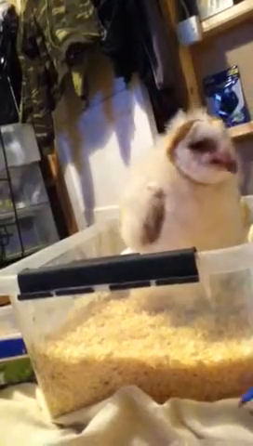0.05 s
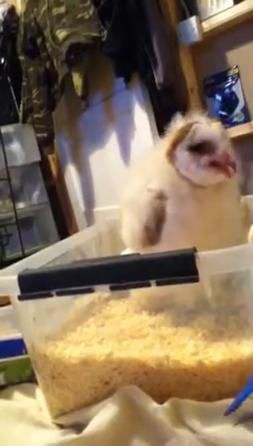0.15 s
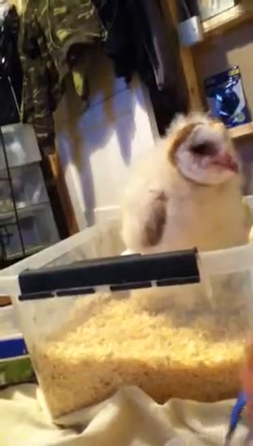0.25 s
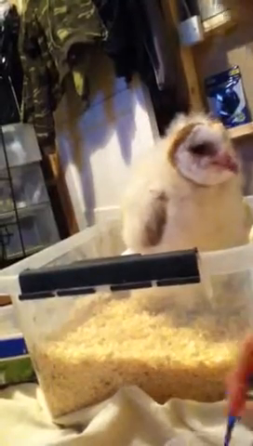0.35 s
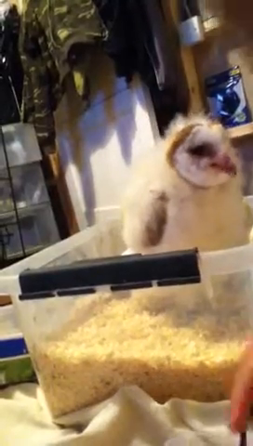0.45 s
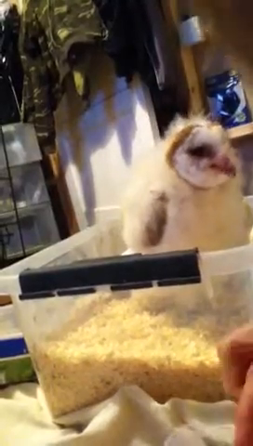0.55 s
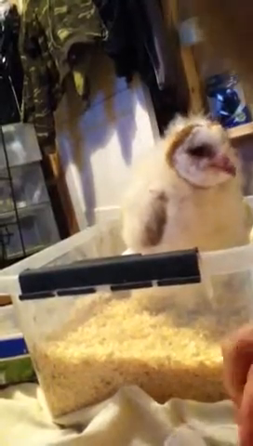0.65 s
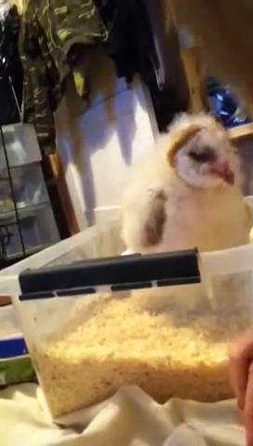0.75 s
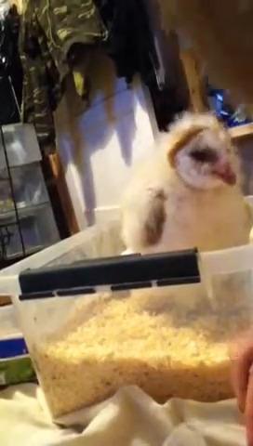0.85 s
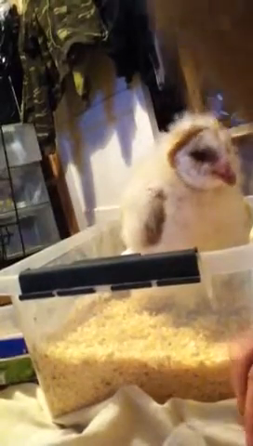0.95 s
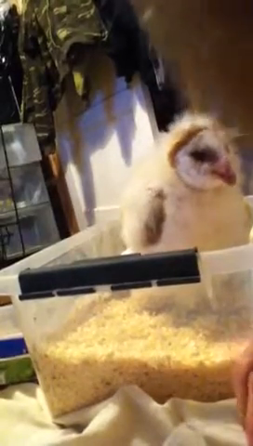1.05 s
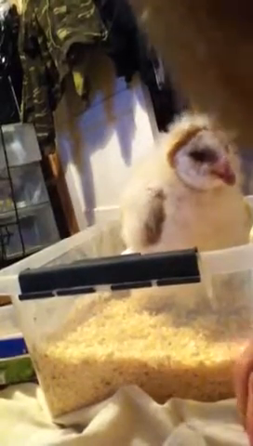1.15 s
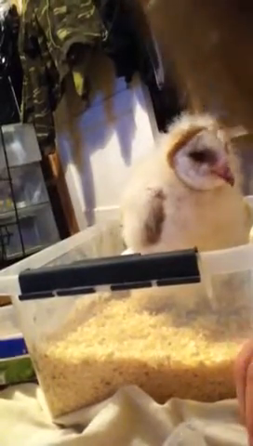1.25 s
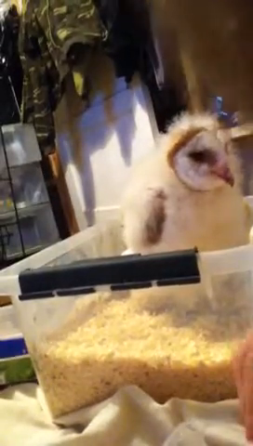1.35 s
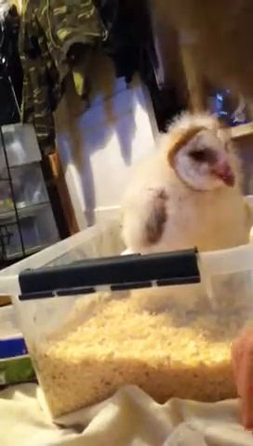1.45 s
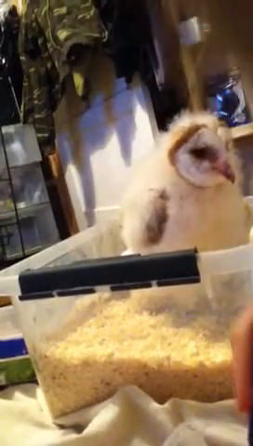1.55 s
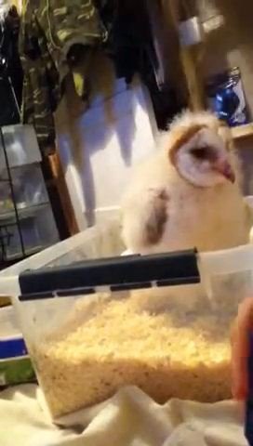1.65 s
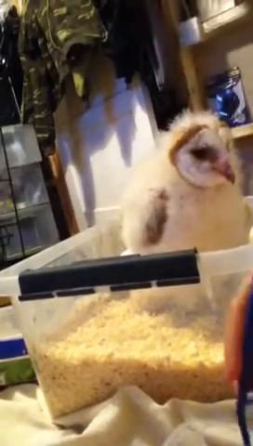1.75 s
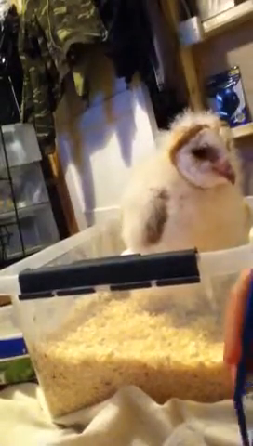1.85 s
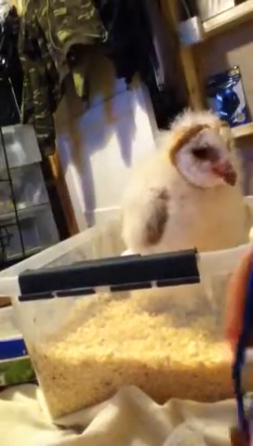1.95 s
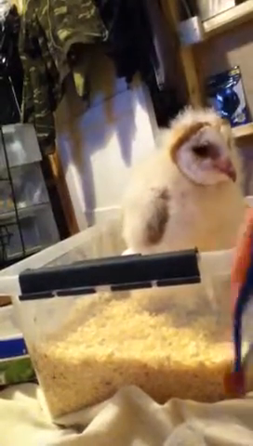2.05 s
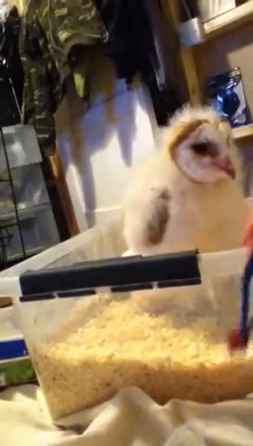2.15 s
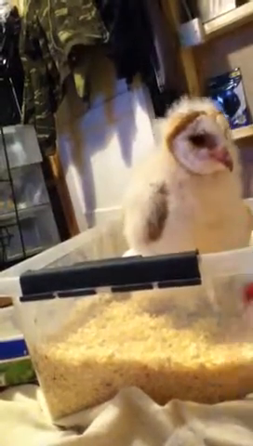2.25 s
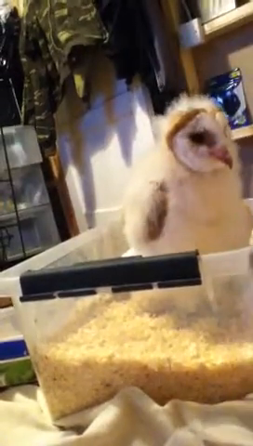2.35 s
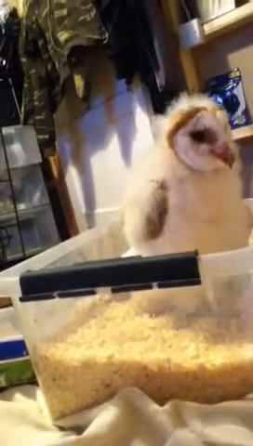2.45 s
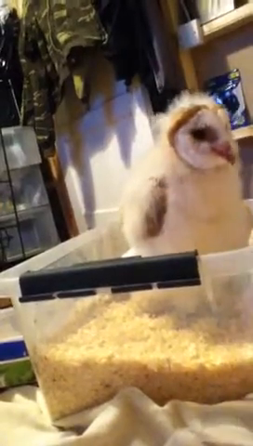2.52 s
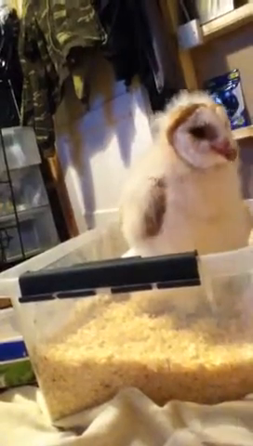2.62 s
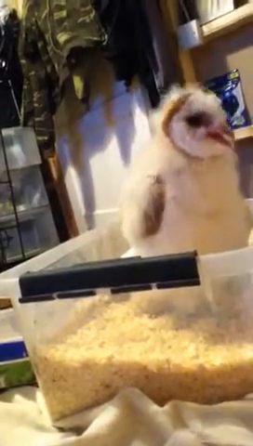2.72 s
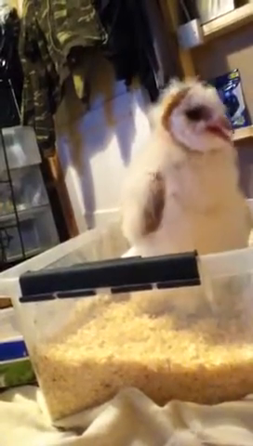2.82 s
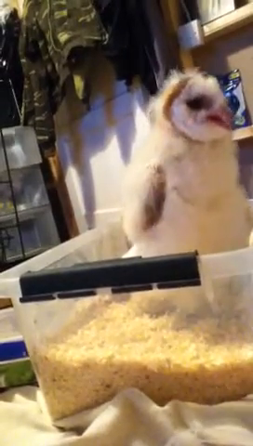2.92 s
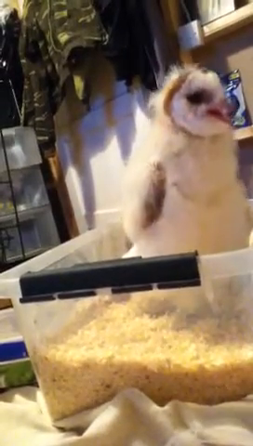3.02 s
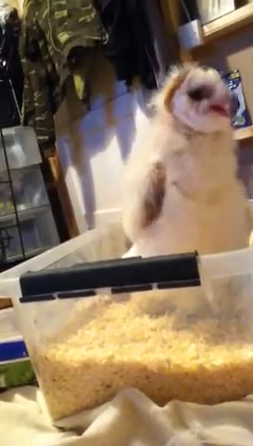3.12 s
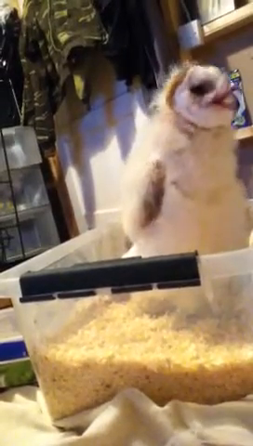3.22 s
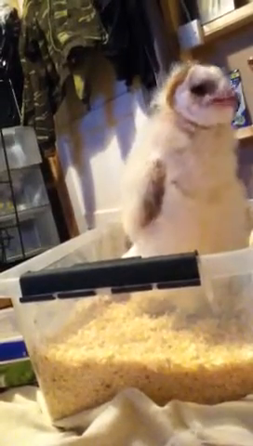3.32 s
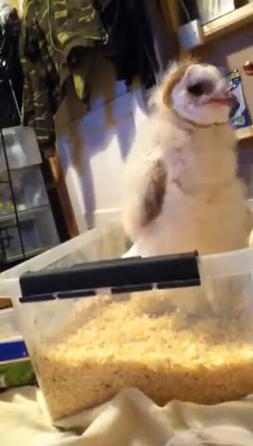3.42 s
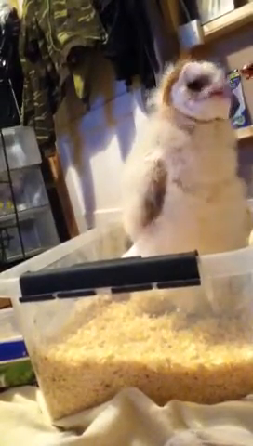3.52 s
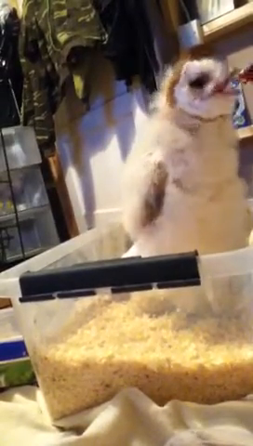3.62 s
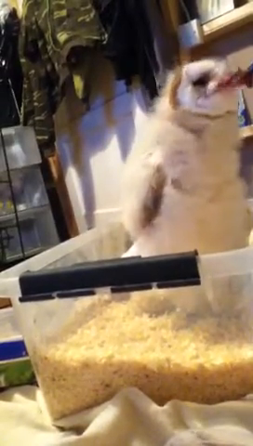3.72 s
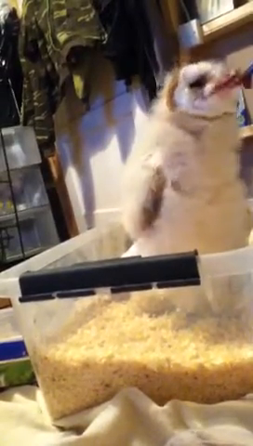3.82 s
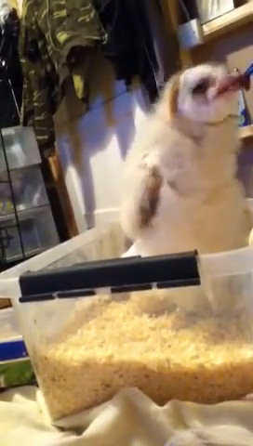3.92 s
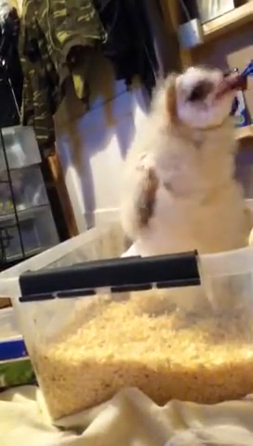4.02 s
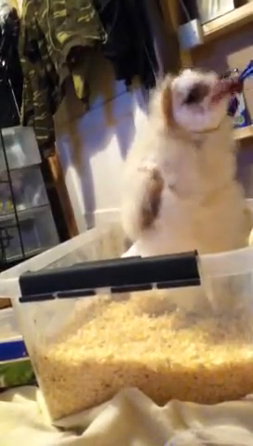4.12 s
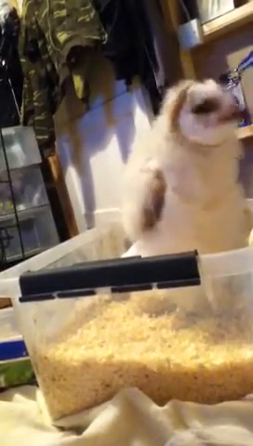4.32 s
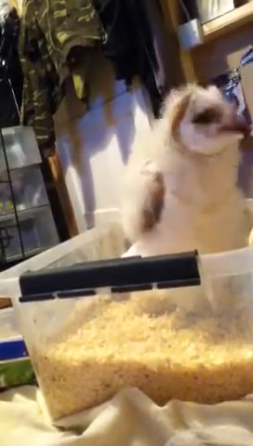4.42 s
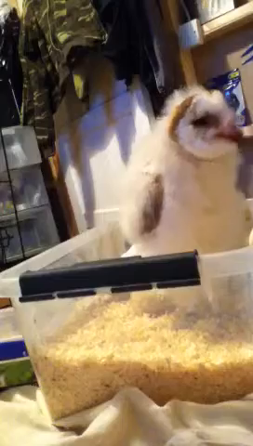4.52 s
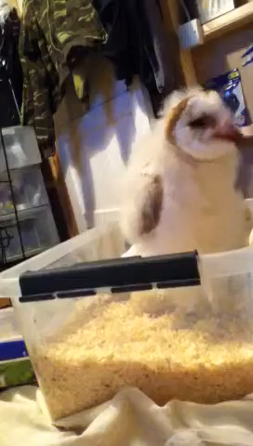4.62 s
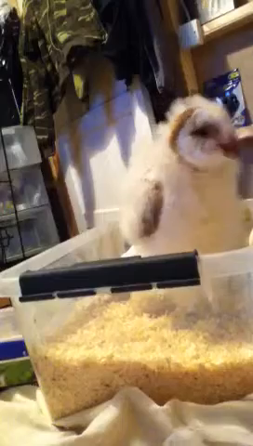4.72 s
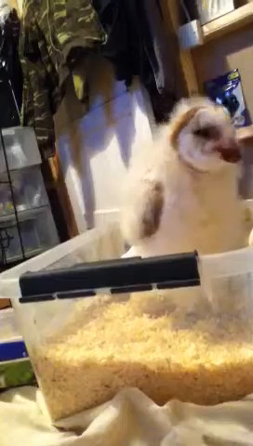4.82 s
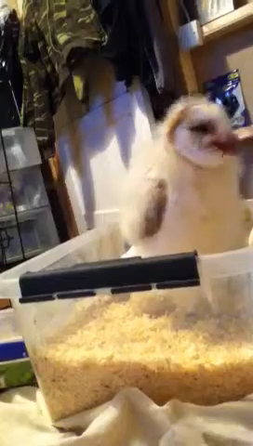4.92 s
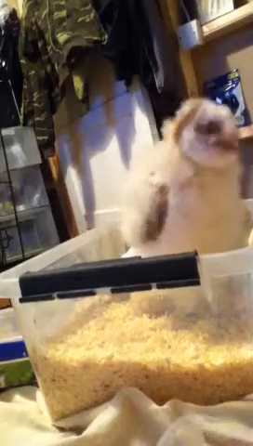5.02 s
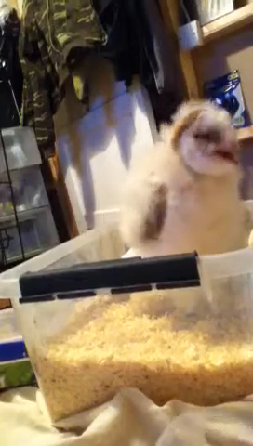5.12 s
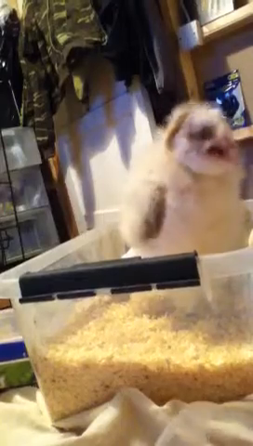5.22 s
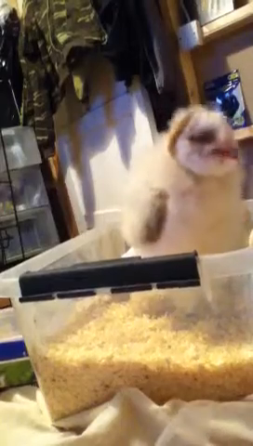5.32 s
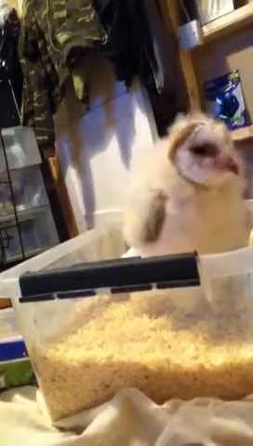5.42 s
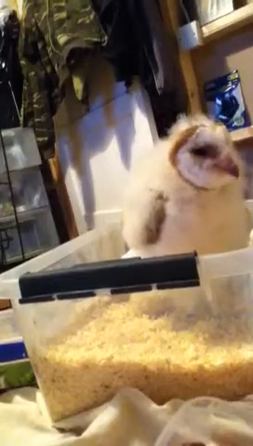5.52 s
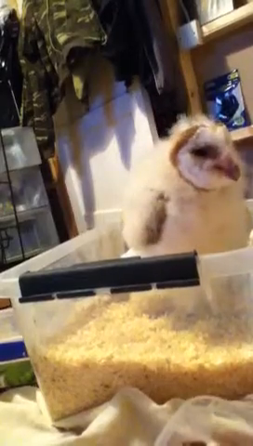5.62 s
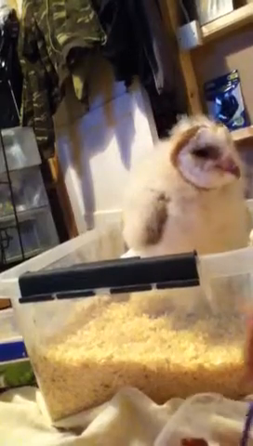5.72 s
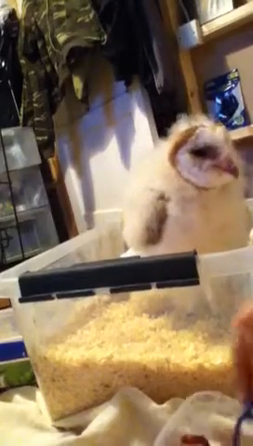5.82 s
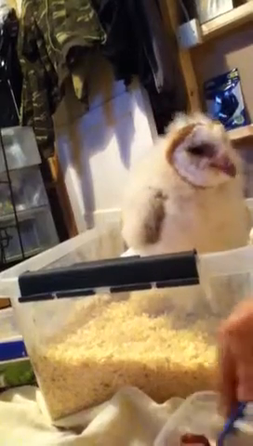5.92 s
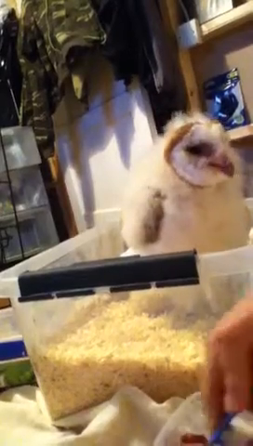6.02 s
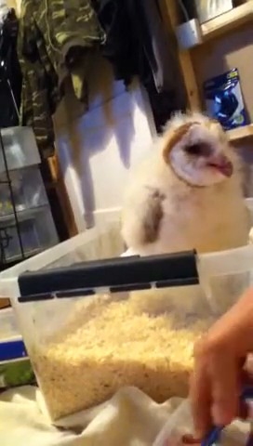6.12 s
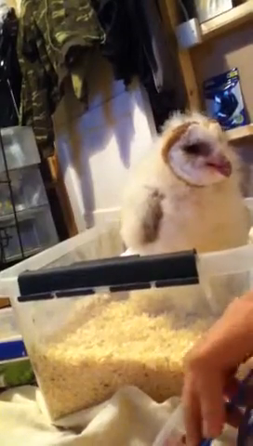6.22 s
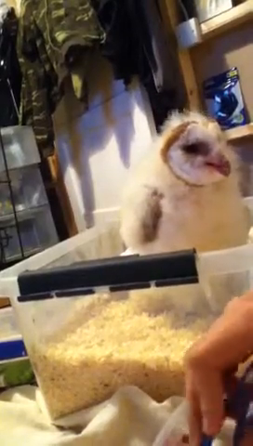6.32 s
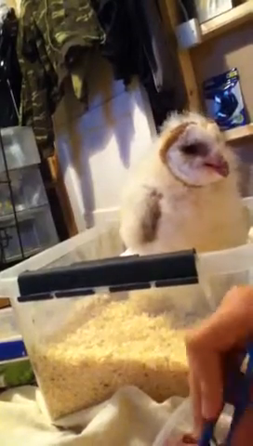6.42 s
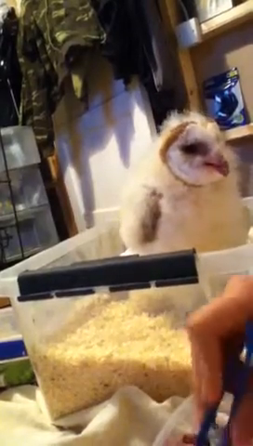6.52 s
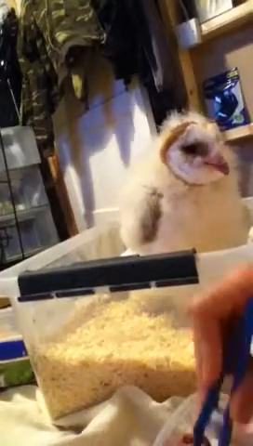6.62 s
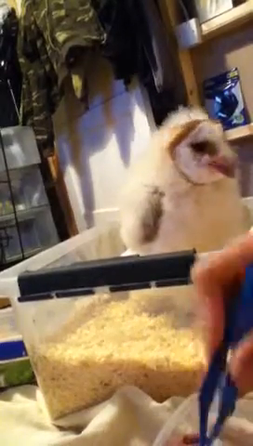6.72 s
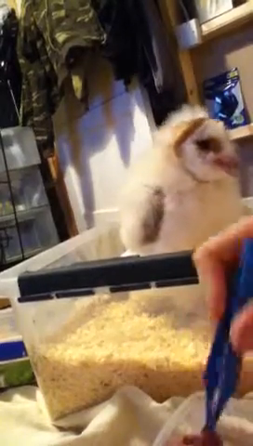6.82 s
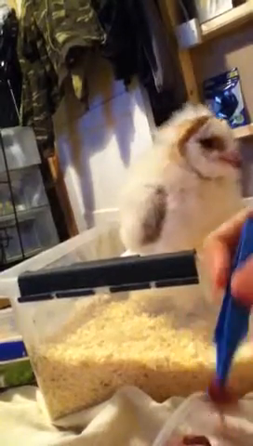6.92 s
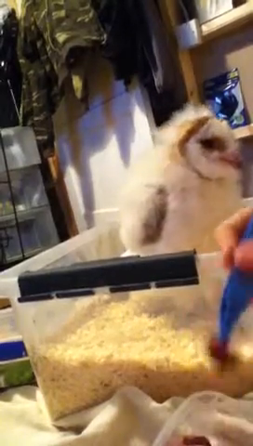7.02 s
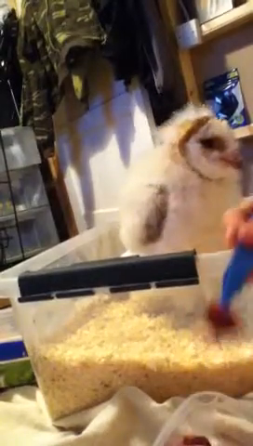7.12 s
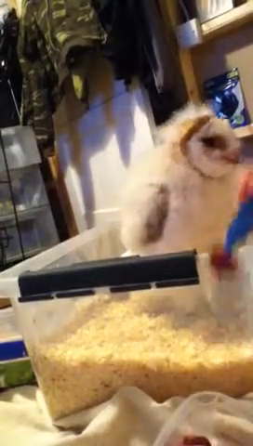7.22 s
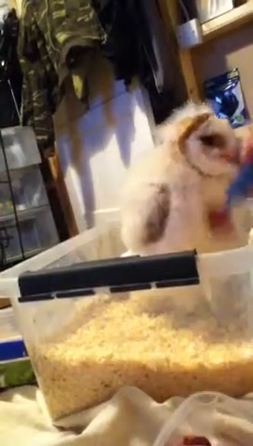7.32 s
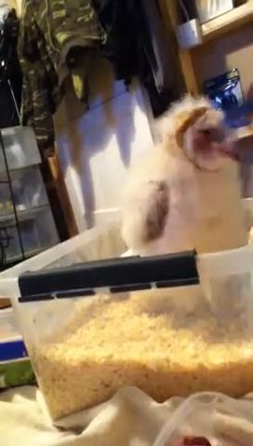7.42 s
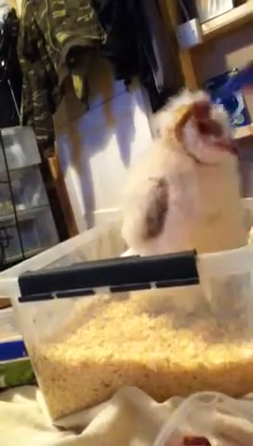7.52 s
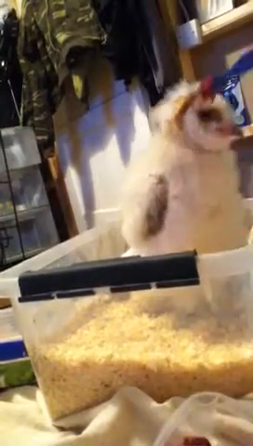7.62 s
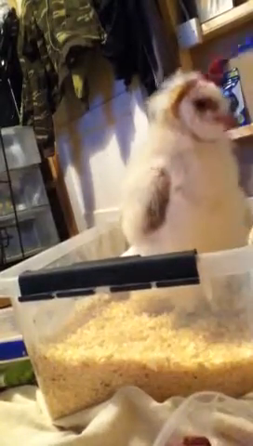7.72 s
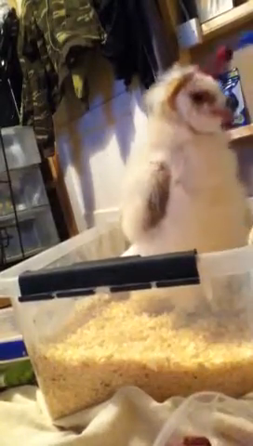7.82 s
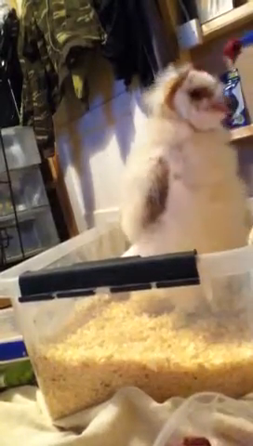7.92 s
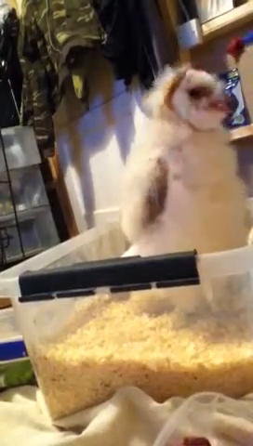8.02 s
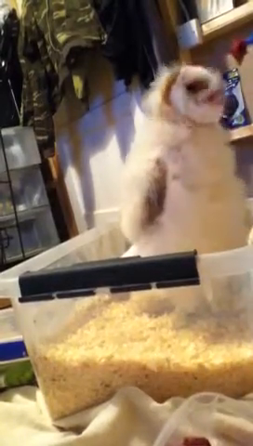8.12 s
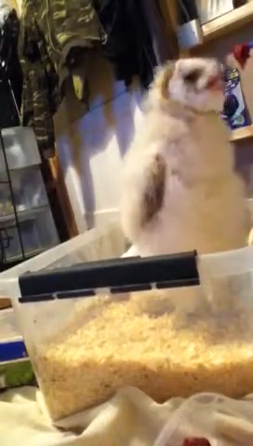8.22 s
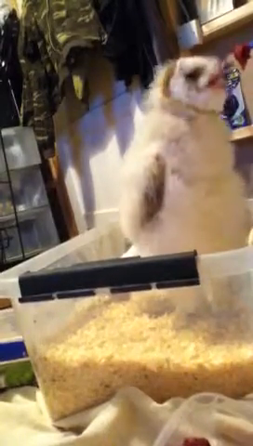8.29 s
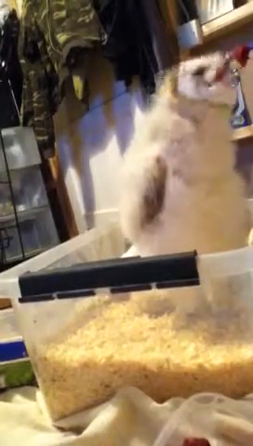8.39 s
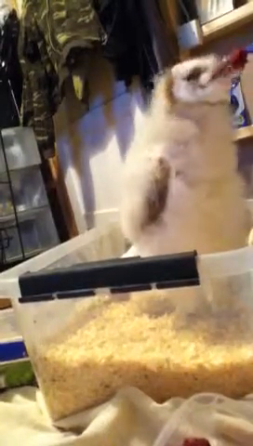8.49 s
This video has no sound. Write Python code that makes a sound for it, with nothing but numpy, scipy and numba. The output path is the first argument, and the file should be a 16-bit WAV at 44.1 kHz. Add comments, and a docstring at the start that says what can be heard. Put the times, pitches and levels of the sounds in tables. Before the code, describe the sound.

Close up in a small, muffled room, a young owl lets out a harsh, breathy screech. A soft knock on a plastic tub follows, then a second, louder screech. After a longer pause with faint clicks of beak and tweezers, the owl screeches twice more. Each call grows in strength and cuts off quickly, with hardly any echo over a faint, steady background hum.

```python
"""In a small, cluttered room, an owl chick close by begs for food with four rasping screeches.
Air forced through the syrinx breaks into sharp, irregular pulses (the source) that excite the
resonances of the throat and open beak (the filter). Between the calls there are only faint ticks of
beak and feeding tweezers, rustles, one soft knock, a brief wavering tone and the room's hum."""
import sys
import numpy as np
from scipy import signal
from scipy.fft import rfft, irfft
from scipy.io import wavfile
from scipy.ndimage import uniform_filter1d
from numba import njit

SR = 44100
rng = np.random.default_rng(int(sys.argv[2]) if len(sys.argv) > 2 else 0)


def to_wav(sig):
    """Store sig (one row per channel, or 1-D mono) as 16-bit WAV at the path in sys.argv[1].

    Samples outside -1..1 are clipped; the rate is SR.
    """
    pcm = np.clip(np.atleast_2d(sig), -1, 1) * 32767
    pcm = np.round(pcm).astype(np.int16)
    wavfile.write(sys.argv[1], SR, pcm.T)  # frames by channels


N = 377055
TIME = np.arange(N) / SR


def undb(db):
    """Amplitude ratio of a level in decibels."""
    return 10 ** (np.asarray(db) / 20)


def unit(x):
    """Normalisation to an rms of 1."""
    return x / np.sqrt(np.mean(x ** 2))


def steady(x, size=1764):
    """Division by the running rms: the envelope flattens, the fast grain remains."""
    return x / np.sqrt(uniform_filter1d(x ** 2, size) + 1e-18)


def ease(x):
    """Cubic step from 0 to 1."""
    x = np.clip(x, 0, 1)
    return x * x * (3 - 2 * x)


def blend(relaxed, strained, strain):
    """Linear interpolation between the relaxed and the strained state."""
    return relaxed + strain * (strained - relaxed)


def swell(x, db):
    """Tapered envelope: a short sound fades in to level db and out again."""
    return undb(db) * unit(x) * signal.windows.tukey(len(x), .6)


def add(out, start_s, x):
    """Superposition of x on out from start_s on."""
    i = max(int(start_s * SR), 0)
    out[i:i + len(x)] += x[:len(out) - i]


@njit
def state_variable(x, tuning, damping):
    """Damped oscillator made of two integrators in a loop; its output is band-passed."""
    y, band_state, low_state = np.empty(len(x)), 0., 0.
    for i in range(len(x)):
        g = tuning[i]
        velocity = (band_state + g * (x[i] - low_state)) / (1 + g * (g + damping[i]))
        band_state = 2 * velocity - band_state
        low_state += 2 * g * velocity
        y[i] = damping[i] * velocity
    return y


def band(x, hz, width):
    """Resonance with gain 1 at a centre frequency that may move."""
    hz = np.minimum(hz, .45 * SR) * np.ones(len(x))
    return state_variable(x + 1e-18, np.tan(np.pi * hz / SR), width / hz)


def bell(x, hz, width, db):
    """Interference of a sound with its resonant band gives a peak or a dip."""
    return x + (undb(db) - 1) * band(x, hz, width)


def colour(x, points, size=8192):
    """Minimum-phase filter through points of (frequency [Hz], gain [dB])."""
    hz, db = np.transpose(points)
    bin_hz = np.maximum(np.arange(size // 2 + 1) * SR / size, 1)
    gain = undb(np.interp(np.log(bin_hz), np.log(hz), db))
    cepstrum = irfft(np.log(gain))
    cepstrum[1:size // 2] *= 2  # folding the cepstrum makes the response causal
    cepstrum[size // 2 + 1:] = 0
    return signal.fftconvolve(x, irfft(np.exp(rfft(cepstrum))))[:len(x)]


def below(x, hz, order=4):
    """Zero-phase low-pass, which keeps pulses in place."""
    return signal.sosfiltfilt(signal.butter(order, hz, fs=SR, output="sos"), x)


def glides(rows, waver, waver_hz):
    """Frequency modulation by noise: gliding tones whose pitch trembles."""
    out = np.zeros(N)
    for start_s, length, start_hz, end_hz, db in rows:
        n = int(length * SR)
        tremble = unit(band(rng.standard_normal(n), waver_hz, 2 * waver_hz))
        hz = np.linspace(start_hz, end_hz, n) * (1 + waver * tremble)
        add(out, start_s, swell(np.sin(2 * np.pi * np.cumsum(hz) / SR), db))
    return out


def room_air():
    """Broadband noise gives rumble and hiss; narrowband noise gives a weak hum."""
    # spectrum of the noise floor: (frequency [Hz], relative spectral density [dB])
    floor_spectrum = [(15, -50), (25, -17), (86, -2), (120, -3.5), (141, -0.5), (189, -2), (269, -3.5),
                      (333, -5.5), (425, -8.5), (513, -11.5), (710, -12.5), (769, -13.5), (1090, -17),
                      (8270, -21.5), (15800, -24)]
    hum = unit(band(rng.standard_normal(N), hz=193, width=8))
    floor = unit(colour(rng.standard_normal(N), floor_spectrum))
    return undb(-56.5) * floor + undb(-74.5) * hum


def faint_tone():
    """A brief background tone falls and wavers by frequency modulation."""
    # the glide: (time [s], duration [s], start pitch [Hz], end pitch [Hz], level [dB])
    tone = [(1.61, .19, 748, 670, -60.5)]
    return glides(tone, waver=.06, waver_hz=50)


def handling(size=4096):
    """Impacts decay exponentially, as noise in ticks and as modes in a knock; rustles are noise bands."""
    # beak and tweezer ticks: (time [s], centre [Hz], bandwidth [Hz], time constant [s], level [dB])
    ticks = [(0.171, 5470, 6000, .003, -45), (1.901, 6500, 3000, 0.0011, -46.5),
             (2.057, 2780, 700, .002, -45.5), (3.804, 8200, 4000, 0.0022, -49),
             (4.002, 2700, 3000, .004, -53), (4.7158, 10100, 3500, 0.0009, -42.5),
             (4.955, 12000, 7000, .001, -48), (5.424, 2200, 1500, 0.0091, -55.5),
             (5.770, 12500, 5000, .001, -49), (6.944, 2100, 1200, .006, -54.5),
             (7.379, 1100, 1000, .004, -52.5)]
    # rustles and soft bumps: (time [s], duration [s], centre [Hz], bandwidth [Hz], level [dB])
    rustles = [(0, .17, 2730, 900, -64.5), (.18, 0.06, 4960, 4000, -59), (2.057, 0.076, 2190, 900, -64),
               (3.7, 0.084, 600, 250, -63), (7.471, .13, 220, 130, -60), (7.93, 0.028, 277, 200, -55)]
    out, t = np.zeros(N), TIME[:size]
    for start_s, hz, width, decay, db in ticks:
        noise = unit(band(rng.standard_normal(size), hz, width))
        add(out, start_s, undb(db) * noise * np.exp(-t / decay))
    for start_s, length, hz, width, db in rustles:
        noise = band(rng.standard_normal(int(length * SR)), hz, width)
        add(out, start_s, swell(band(noise, hz, width), db))
    # modes of a knocked plastic tub: (frequency [Hz], 60 dB decay time [s], level [dB])
    knock_s, tub_modes = 2.0572, [(346, .032, -41), (700, .0098, -38)]
    for hz, t60, db in tub_modes:
        add(out, knock_s, undb(db - 60 * t / t60) * np.sin(2 * np.pi * hz * t))
    return out


def syrinx(rate, jitter, scatter_db, turbulence, count=6000):
    """Aperiodic source: pulses, each with its own gap and size, in a stream of turbulent air."""
    # spectrum of one pulse: (frequency [Hz], gain [dB])
    pulse_spectrum = [(200, -19), (500, -17), (1100, -13), (1700, -4), (3000, -2), (6000, -2.5),
                      (10000, 0.0), (13000, -5), (15500, -13)]
    timing, size = rng.standard_normal((count, 2)).T
    gap = np.exp(jitter * timing - jitter ** 2 / 2)  # log-normal, with a mean of one period
    onsets = np.searchsorted(np.cumsum(rate) / SR, np.cumsum(gap))
    heard = onsets < len(rate)
    strength = np.sqrt(gap) * undb(scatter_db * size)  # pressure builds up during a long gap
    pulses = np.bincount(onsets[heard], strength[heard], len(rate))
    pulses -= below(pulses, 260, order=2)  # steady flow makes no sound
    return colour(steady(pulses) + turbulence * rng.standard_normal(len(rate)), pulse_spectrum)


def screech(call, throat):
    """Source and filter: a rasp swells, tires and stops; its formants move with strain and the beak."""
    length, flow_db, wait, rise, exponent, release, push_db, tensing, strained_rate = call[:9]
    notch_width = call[9]
    treble, notch, notch_depth = np.reshape(call[10:], (3, 2))
    onset_s, attack_s, opening_s, closing_s = .0062, .025, .018, .075
    tiring_db_per_s, treble_tiring_db_per_s = 9, 8.5
    shut_treble_db, shut_sink = -9, .18  # a shut beak dulls the treble and lowers the formants
    relaxed_rate = 1200  # pulses per second

    # A weak airflow opens and closes the call; the push swells on top of it, then tires.
    t = TIME[:int((length + closing_s) * SR)]
    ending = 1 - np.clip((t - length) / closing_s, 0, 1)
    flow = ease(t / onset_s) * ending
    push = ease((t - wait) / attack_s) * np.clip((t - wait) / rise, 0, 1) ** exponent
    push /= 1 + np.exp((t - length) / release)
    tired_s = np.maximum(t - wait - rise, 0)
    envelope = np.hypot(flow * undb(flow_db), push * undb(push_db - tiring_db_per_s * tired_s))
    strain = ease(t / tensing) * ending
    shut = 1 - ease(t / opening_s) * ending

    voice = syrinx(blend(relaxed_rate, strained_rate, strain), jitter=.48, scatter_db=2.5, turbulence=.44)
    for relaxed_hz, strained_hz, width, relaxed_db, strained_db in throat:
        formant_hz = (1 - shut_sink * shut) * blend(relaxed_hz, strained_hz, strain)
        voice = bell(voice, formant_hz, width, blend(relaxed_db, strained_db, strain))
    for _ in range(2):  # the antiresonance of the beak cavity, in two stages for steep sides
        voice = bell(voice, blend(*notch, strain), notch_width, blend(*notch_depth, strain) / 2)
    body = below(voice, hz=6800)
    treble_db = blend(*treble, strain) + shut_treble_db * shut - treble_tiring_db_per_s * tired_s
    rasp = envelope * (steady(body) + undb(treble_db) * steady(voice - body))

    # The hollow rush of air in the throat grows far more slowly than the rasp.
    rush = unit(band(band(rng.standard_normal(len(t)), 650, 550), 640, 1300))
    return rasp + undb(-48.5) * envelope ** .1 * flow * rush


def owl():
    """Airflow drives four screeches, each with its own formants, and brief squeaks and wheezes."""
    # squeaks as the airway opens or closes, and hollow wheezes that end a call:
    # (time [s], duration [s], start pitch [Hz], end pitch [Hz], level [dB])
    squeaks = [(.703, .007, 2600, 2500, -42.5), (5.9595, 0.0082, 3230, 3100, -44),
               (6.747, .025, 3580, 2580, -52), (8.0178, 0.0039, 3130, 2900, -40)]
    wheezes = [(1.395, 0.078, 1800, 1364, -53.5), (3.40, 0.047, 1410, 1060, -47.5)]
    # the calls: (time [s], duration [s], flow level [dB], delay of the push [s], rise time [s],
    # rise exponent, release time [s], push level [dB], time to full strain [s], strained pulse
    # rate [1/s], antiresonance width [Hz], then relaxed and strained pairs of: treble gain [dB],
    # antiresonance frequency [Hz], antiresonance gain [dB])
    calls = [ (.703, .655, -44, 0.0022, 0.5, .68, .015, -24, 0.29, 1141, 1000, -9, -2.5, 8900, 8850, -26, -9),
             (2.586, 0.7963, -46, 0.041, .56, 0.52, 0.01, -22, 0.69, 3328, 1900, 2.5, -0.2, 8300, 12100, 4, -27),
             (5.958, 0.753, -44, 0.037, .49, 0.33, 0.0082, -24, .4, 1150, 1400, -1.5, -3, 8230, 8330, -4, -3),
             (8.016, .7, -47, .04, 0.32, .74, .012, -22.5, .36, 2200, 500, 7, 1.9, 6480, 6200, -15, -14)]
    # formants of throat and beak and the dips between them, one table a call: (relaxed frequency [Hz],
    # strained frequency [Hz], bandwidth [Hz], relaxed gain [dB], strained gain [dB])
    throat_1 = [(640, 590, 630, 14.5, 5), (2050, 2010, 210, 0, 4.5), (3150, 3180, 490, 10.5, 9.0),
                (3900, 3970, 730, 7, 6.0), (5470, 5760, 1230, 6.5, 8.5), (7500, 7730, 590, 12.5, 6.5),
                (9070, 9430, 2100, 0, 6.5), (13000, 11800, 1260, 5, 4.5)]
    throat_2 = [(670, 710, 280, 9.3, 14.3), (1640, 1600, 240, 1.6, 8.6), (2150, 2020, 350, -4, -4),
                (3130, 3060, 470, 9.5, 18), (4100, 4200, 220, 0.5, 3.3), (5900, 5220, 540, 8.1, 9.1),
                (6500, 6100, 600, -3, -3), (7300, 7980, 1080, 3.3, 16), (9000, 9400, 370, 8.6, 1.7),
                (14250, 13600, 1250, 4, 11.5)]
    throat_3 = [(630, 620, 270, 10.5, 8.8), (1790, 1910, 460, 5.0, 6.1), (3180, 3100, 600, 10, 9.3),
                (3800, 3930, 560, 5.7, 8.0), (5800, 5600, 780, 8.9, 11.5), (6930, 7260, 380, 5.5, 5.7),
                (9800, 9970, 1600, 11, 5.6), (12100, 12300, 2500, 4.5, 6.3)]
    throat_4 = [(640, 710, 150, 17.5, 15), (1590, 1630, 165, 1.8, 12.5), (2900, 3045, 350, 11, 17.8),
                (4360, 4095, 350, 2.5, 5.2), (5600, 5470, 680, 4.3, 7.7), (7050, 7180, 1440, 15, 13.8),
                (8300, 8340, 390, 7, 5.2), (10000, 9400, 700, 9.6, 5.8), (12200, 11510, 3000, 11.5, 11.7)]
    out = glides(squeaks, waver=.03, waver_hz=150) + glides(wheezes, waver=.17, waver_hz=150)
    for (start_s, *call), throat in zip(calls, [throat_1, throat_2, throat_3, throat_4]):
        add(out, start_s, screech(call, throat))
    return out


def reverberation(x, t60, wet_db, damp_hz, size=11025):
    """Absorption by hanging clothes and shelves leaves only a short, dull reverberant tail."""
    t = TIME[:size]
    tail = below(rng.standard_normal(size), damp_hz, order=1)
    tail *= undb(-60 * t / t60) * (t > .003)
    return x + undb(wet_db) * signal.fftconvolve(x, tail / np.linalg.norm(tail))[:N]


def scene():
    """Superposition of the near sources, their reverberation and the background, alike in both channels."""
    near = reverberation(owl() + handling(), t60=.13, wet_db=-15, damp_hz=7000)
    mono = near + faint_tone() + room_air()
    return np.array([mono, mono])


def record(dry):
    """Band limiting: a steep elliptic low-pass removes the treble above 15.8 kHz."""
    return signal.sosfilt(signal.ellip(10, .1, 80, 15800, fs=SR, output="sos"), dry)


dry = scene()
out = record(dry)
to_wav(out)
```